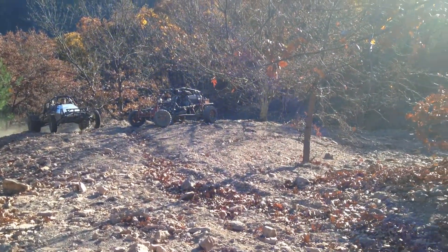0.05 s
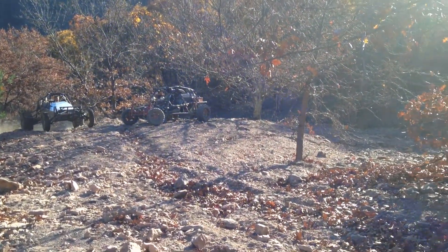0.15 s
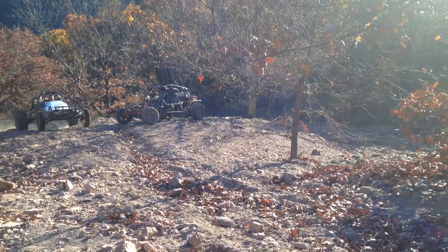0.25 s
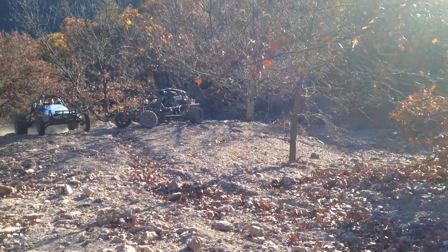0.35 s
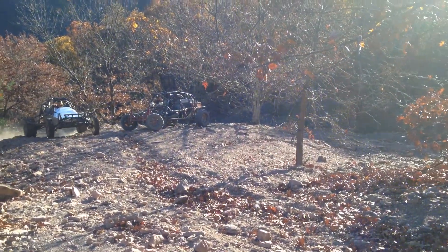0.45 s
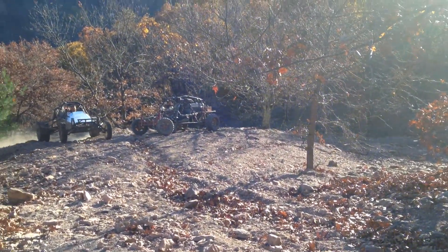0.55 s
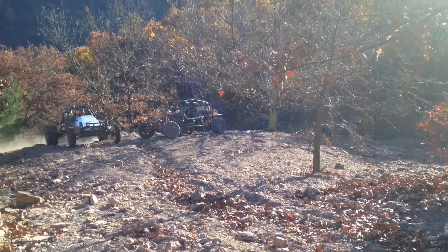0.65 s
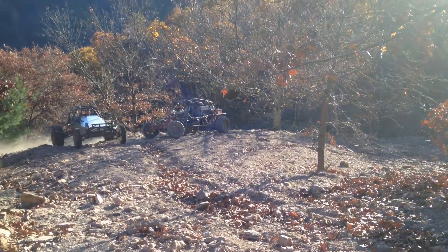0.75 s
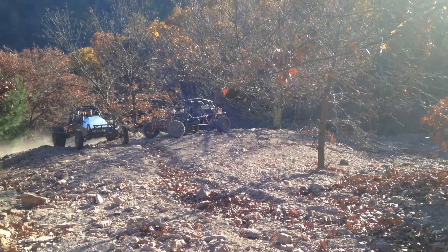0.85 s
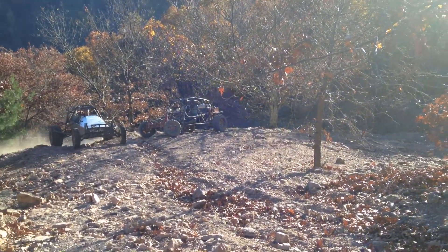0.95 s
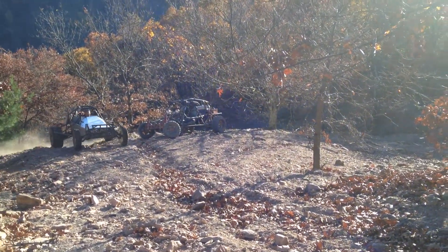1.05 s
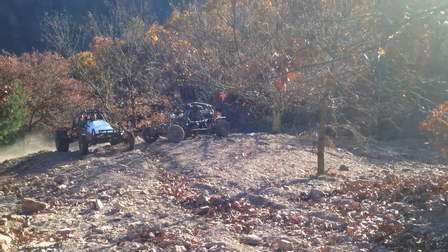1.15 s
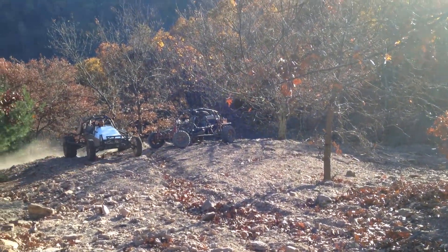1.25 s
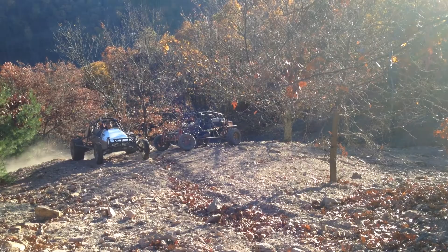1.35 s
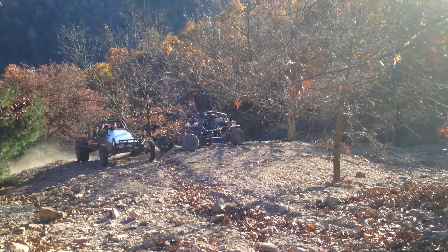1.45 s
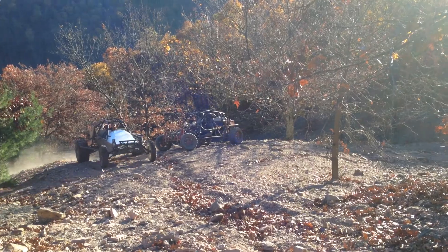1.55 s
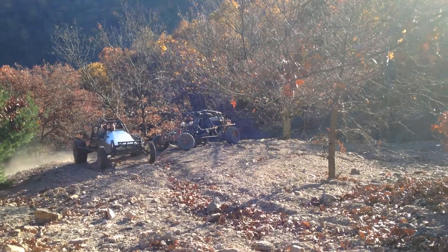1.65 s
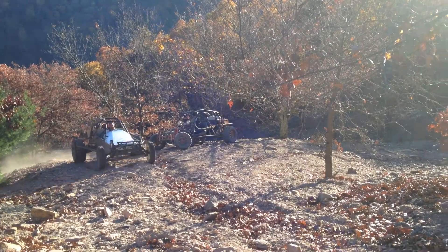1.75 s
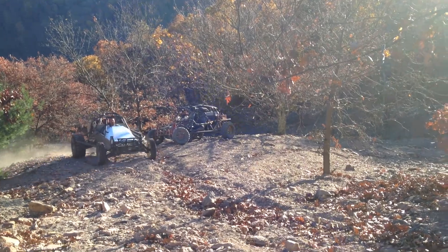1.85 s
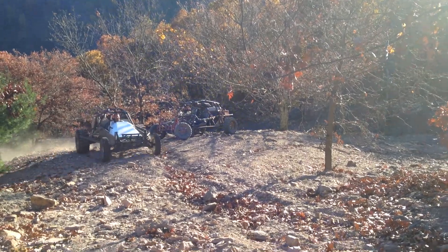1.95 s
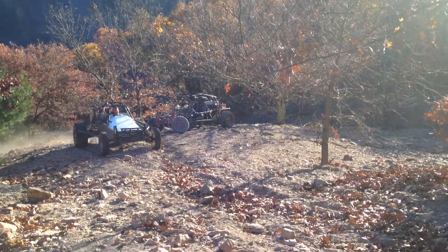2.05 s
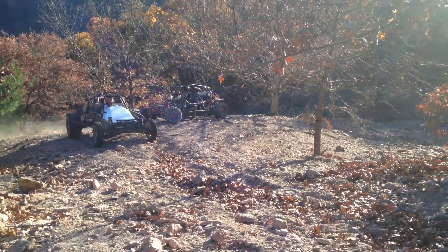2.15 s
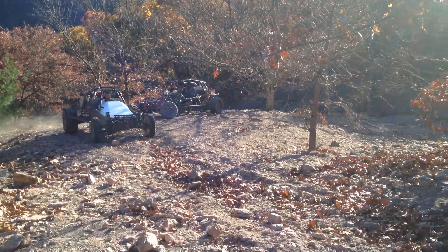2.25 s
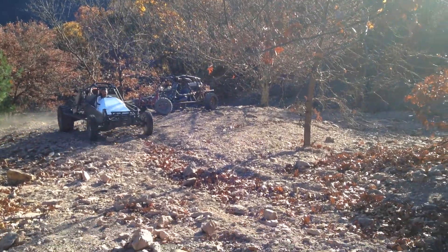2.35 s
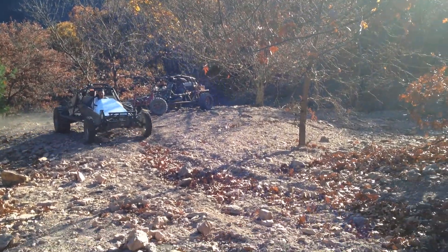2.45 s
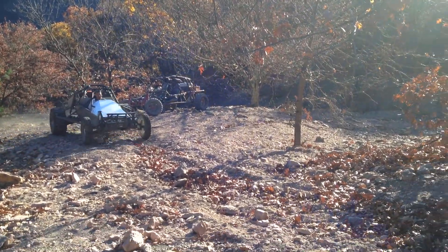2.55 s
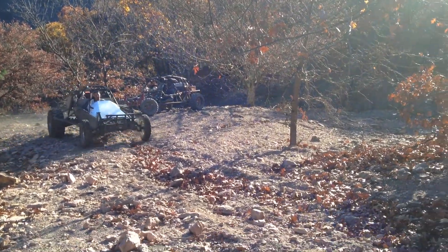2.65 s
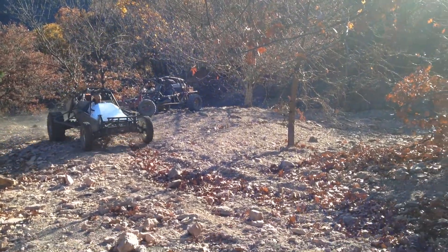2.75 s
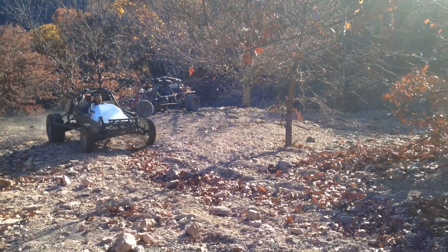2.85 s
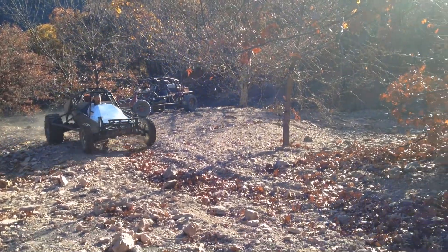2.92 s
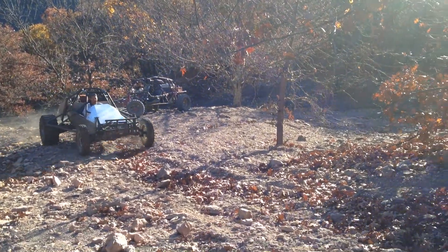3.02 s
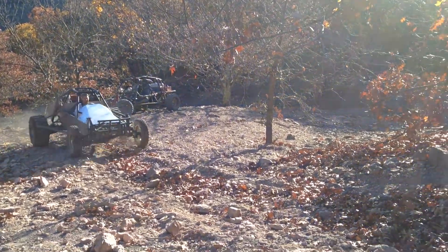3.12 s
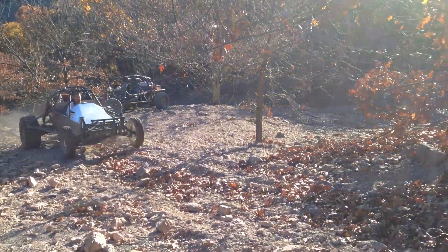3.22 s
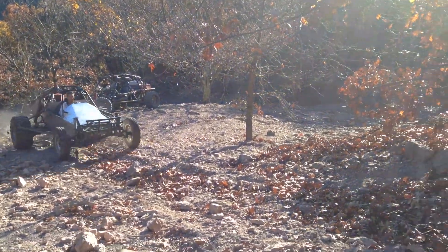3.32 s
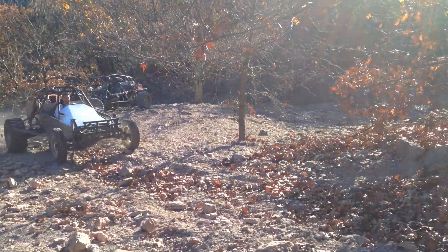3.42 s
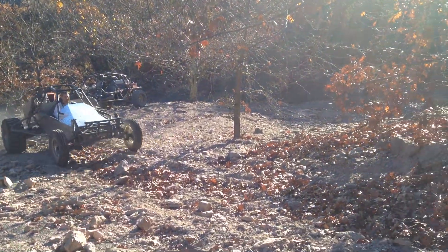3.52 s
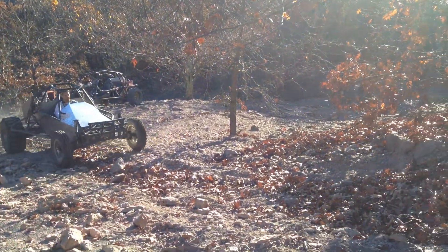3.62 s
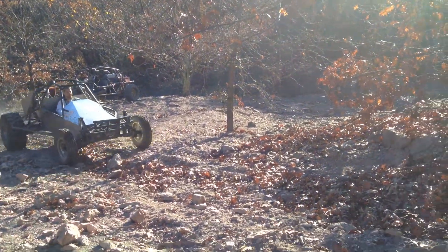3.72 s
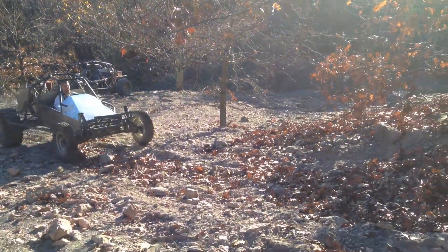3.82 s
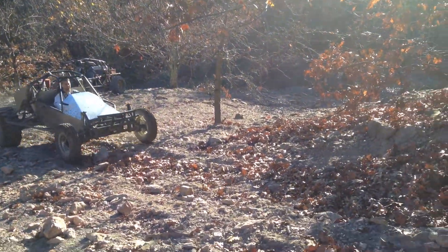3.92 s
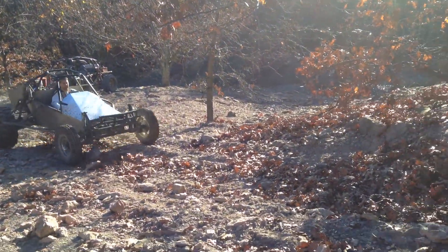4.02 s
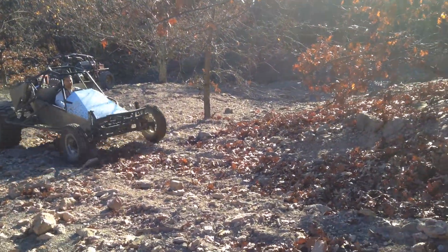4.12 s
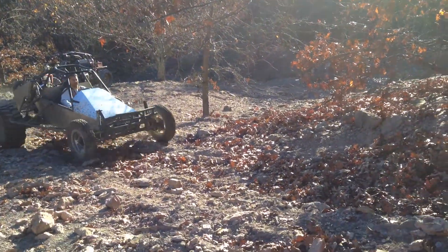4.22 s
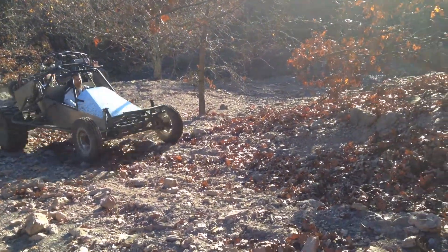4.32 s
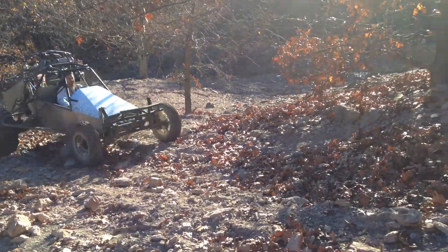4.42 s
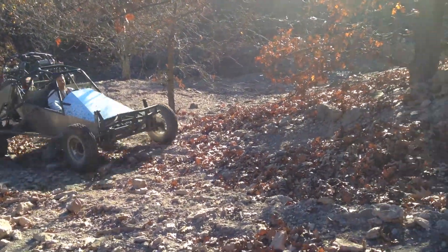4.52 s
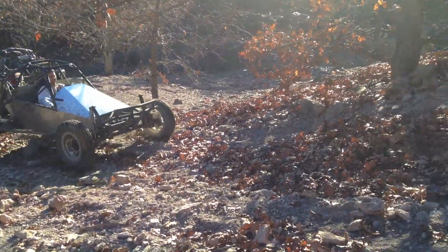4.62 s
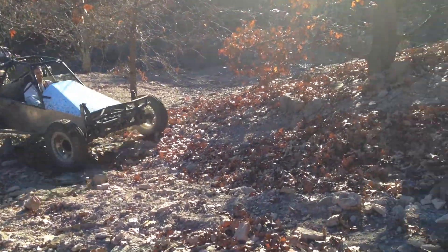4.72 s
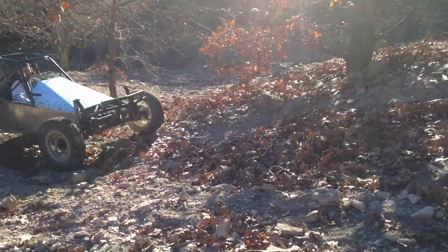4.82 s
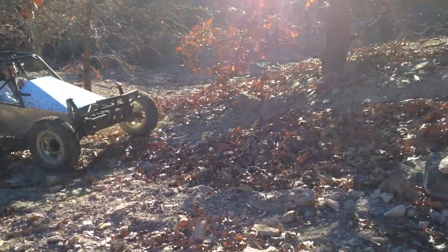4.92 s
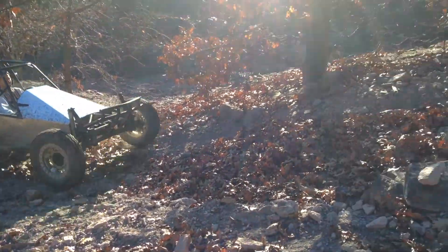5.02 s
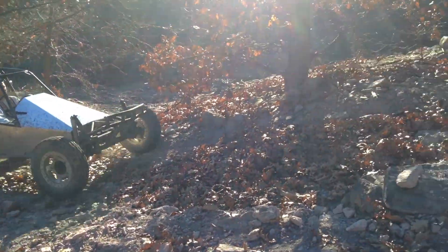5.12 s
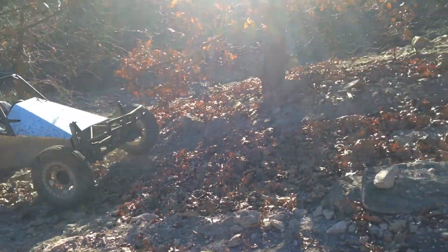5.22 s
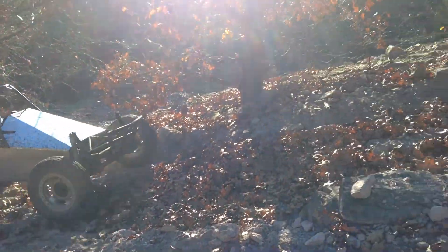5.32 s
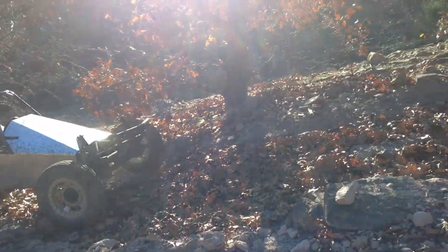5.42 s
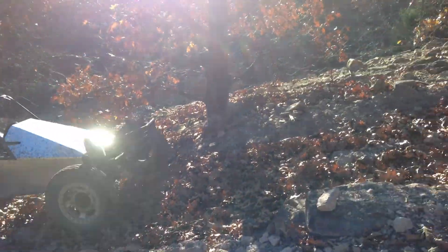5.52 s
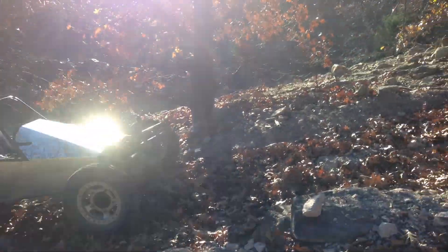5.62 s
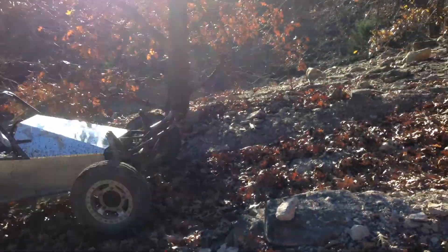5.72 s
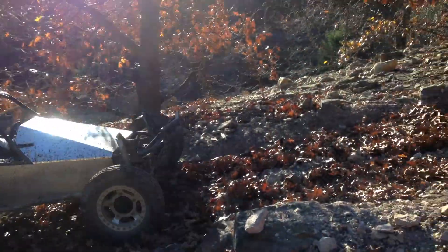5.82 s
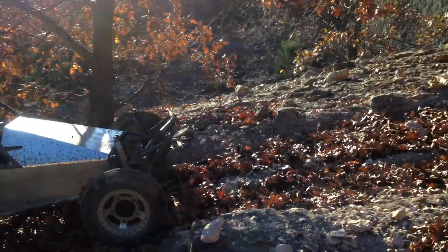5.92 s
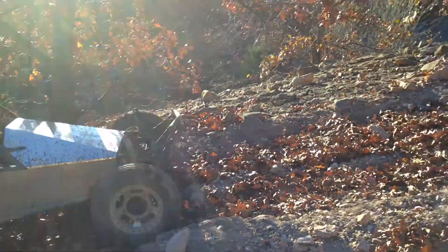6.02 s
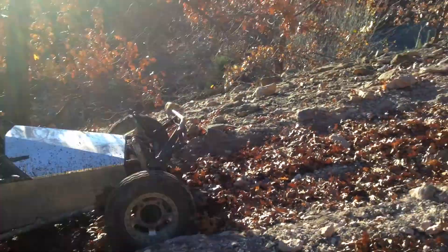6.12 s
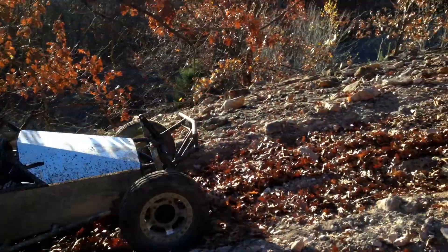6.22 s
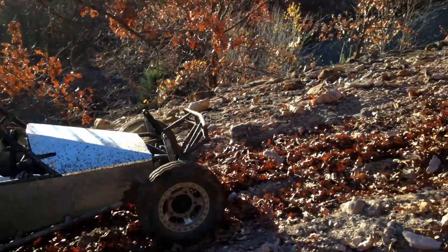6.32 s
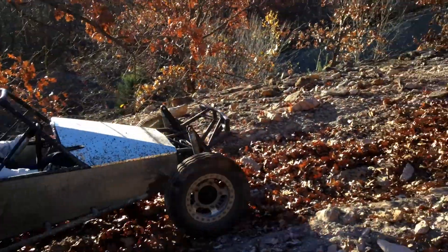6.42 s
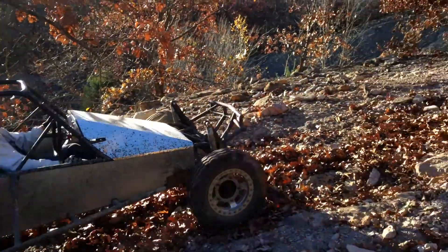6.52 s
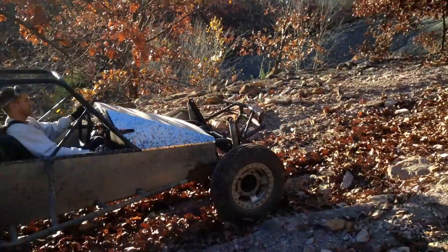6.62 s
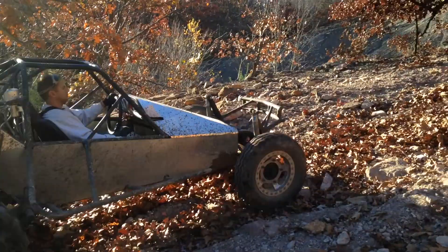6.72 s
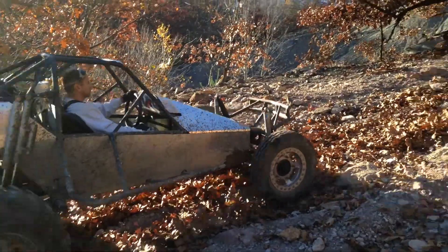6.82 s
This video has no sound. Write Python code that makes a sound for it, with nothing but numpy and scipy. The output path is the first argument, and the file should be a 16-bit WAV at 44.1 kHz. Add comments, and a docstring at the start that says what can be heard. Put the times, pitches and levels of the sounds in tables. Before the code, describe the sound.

Outdoors in quiet woods, a buggy engine approaches with low, separate exhaust thumps and hissing rasp. It sags to a stumble early, then chugs unevenly with frequent misfires. Later the throttle opens, the pitch climbs and the exhaust barks louder. At the end it is close to the microphone, with tyres crushing stones and dry leaves and a few dull frame knocks.

```python
"""Woods: a dune buggy crawls over stony ground, stumbling at low revs, then pulls hard up a loose slope close by.
Each firing is a low exhaust thump with a puff of rasping, hissing gas; some miss and give only a weak pulse.
The fronts of the pulses ring the pipe, which barks more with speed and nearness, and every firing shakes thin steel.
The tyres crush stones and dry leaves (dense noise grains), the chassis knocks, and the trees send back faint echoes."""
import sys
import numpy as np
from scipy import signal
from scipy.fft import rfft, irfft, next_fast_len
from scipy.io import wavfile

SR = 44100
rng = np.random.default_rng(int(sys.argv[2]) if len(sys.argv) > 2 else 0)


def wav_out(sig):
    """Save sig, one row per channel (or a flat mono array), as 16-bit PCM at SR to the path in sys.argv[1]."""
    wavfile.write(sys.argv[1], SR, np.round(np.clip(np.atleast_2d(sig).T, -1, 1) * 32767).astype(np.int16))


N = 302526
TIME = np.arange(N) / SR


def from_db(db):
    """Amplitude factor of a level in dB."""
    return 10 ** (np.asarray(db) / 20)


def rms_one(x):
    """Scale to unit RMS."""
    return x / np.sqrt(np.mean(x ** 2) + 1e-20)


def read(rows, at):
    """The columns of a curve at the given times."""
    s, *columns = np.transpose(rows)
    return [np.interp(at, s, column) for column in columns]


def colour(x, spectrum):
    """Causal (minimum-phase) filter with the given spectrum and unit energy."""
    size = next_fast_len(N + SR // 2)
    hz, db = np.transpose(spectrum)
    bin_hz = np.arange(size // 2 + 1) * SR / size
    gain = rms_one(from_db(np.interp(np.log(bin_hz + 1), np.log(hz), db)))
    # folding the cepstrum onto positive time gives minimum phase
    cepstrum = irfft(np.log(gain), size)
    cepstrum[1:size // 2] *= 2
    cepstrum[size // 2 + 1:] = 0
    response = np.exp(rfft(cepstrum))
    return irfft(rfft(x, size) * response, size)[:N]


def resonate(x, hz, width_hz):
    """Two-pole resonance of unit energy."""
    r = np.exp(-np.pi * width_hz / SR)
    zeros = np.sqrt((1 - r * r) / 2) * np.array([1, 0, -1])
    poles = [1, -2 * r * np.cos(2 * np.pi * hz / SR), r * r]
    return signal.lfilter(zeros, poles, x + 1e-18)   # the offset avoids denormals


def smear(x, seconds):
    """Exponential tail of unit area."""
    r = np.exp(-1 / (seconds * SR))
    return signal.lfilter([1 - r], [1, -r], x + 1e-18)


def clicks(times, sizes):
    """A train of single-sample impulses."""
    samples = np.clip(np.round(times * SR).astype(int), 0, N)
    return np.bincount(samples, sizes, N + 1)[:N]


def uneven(count, spread_db):
    """A random gain for each firing."""
    return from_db(spread_db * np.clip(rng.standard_normal(count), -2, 2))


def puffs(times, sizes, rise_s, fall_s, linger_s, linger_db):
    """Turbulence that bursts out as a valve opens, then eddies on."""
    power = smear(clicks(times, sizes ** 2), rise_s)
    power = smear(power, fall_s) + from_db(linger_db) ** 2 * smear(power, linger_s)
    return np.sqrt(power) * rng.standard_normal(N)


def engine(gas_lag_s=.0016, gas_spread_db=2.0, hiss_spread_db=2.5):
    """Every firing blows through one exhaust: pressure thump, pipe bark, turbulent gas and shaken steel."""
    # What a firing gives off. Each law: dB at half throttle, mid speed and reference distance,
    # dB from shut to open, dB per octave of speed, dB per halving of distance.
    thump_law = (-20.5, 18, 3, 1.5)
    bark_law = (-42.5, 1.5, 21, 12)
    rasp_law = (-48, 12.5, 1.5, 6.5)
    hiss_law = (-48.5, 8, -2.5, 7.5)
    # Spectra of the turbulent gas. Each row: frequency in Hz, relative level per Hz in dB.
    rasp_spectrum = [(250, -17.5), (500, 4.5), (1100, 3.5), (1500, -0.5), (1800, -2.5), (2350, -5.5),
                     (2900, -5.5), (3400, -5.5), (3900, -7.5), (5000, -14), (9000, -20)]
    hiss_spectrum = [(2500, -27.5), (4500, -5), (5500, -5), (6500, -2.5), (8000, -2), (9800, -0.5),
                     (11500, -3), (13500, -0.5), (15500, -11)]
    # How loosely the steel rattles. Each row: time in seconds, gain in dB.
    rattle = [(.6, -10), (.95, 1.5), (3, 2), (4.6, 3.5), (6, 2)]

    times, period, strength = firings()
    count = len(times)
    size = strength * np.sqrt(period * SR)   # a slow cycle holds more energy
    thumps, barks, rasps, jets = (size * from_db(follow(law, times, period))
                                  for law in (thump_law, bark_law, rasp_law, hiss_law))
    blown = times + gas_lag_s
    gas = uneven(count, gas_spread_db)
    rasp = puffs(blown, gas * rasps, rise_s=0.000093, fall_s=0.0046, linger_s=0.038, linger_db=1.0)
    jets = gas * jets * uneven(count, hiss_spread_db)
    hiss = puffs(blown, jets, rise_s=0.003, fall_s=0.004, linger_s=0.034, linger_db=-10.5)
    jolted = blown + rng.uniform(0, .001, count)
    metal = steel(jolted, size * from_db(read(rattle, times)[0]))
    pipe = thump(times, period, thumps) + bark(blown, barks)
    return pipe + metal + colour(rasp, rasp_spectrum) + colour(hiss, hiss_spectrum)


def firings(missed_db=-16, wobble_per_s=.5, spark_jitter_s=0.00013):
    """Time, period and strength of every firing; an unlit cylinder only pumps air."""
    times, period, missed = flywheel()
    # no two charges burn alike, and the slower the flywheel turns, the less evenly it runs
    jitter_s = np.hypot(spark_jitter_s, wobble_per_s * period ** 2)
    times = times + jitter_s * rng.standard_normal(len(times))
    return times, period, from_db(np.where(missed, missed_db, 0.0))


def flywheel(sag_per_miss_hz=.34, recovery_s=.0886):
    """Time and period of every stroke, and whether it misses; each miss slows the engine a little."""
    # Engine speed before sagging. Each row: time in seconds, firings per second.
    speed_hz = [(0.0, 51.22), (0.057, 54.26), (0.186, 44.44), (0.411, 48.25), (0.544, 36.19),
                (0.827, 37.03), (0.987, 43.03), (1.225, 45.56), (1.361, 54.14), (1.631, 48.04),
                (1.954, 51.03), (2.431, 51.47), (2.573, 59.44), (2.945, 51.79), (3.132, 58.73),
                (3.756, 57.58), (3.912, 51.93), (4.736, 56.24), (5.016, 68.97), (5.318, 52.09),
                (5.576, 80.38), (5.666, 78.81), (6.195, 92.17), (6.339, 85.36), (6.493, 96.36),
                (6.694, 87.99), (6.86, 98.1)]
    # Bouts of misfiring, which recur as the same cylinders come round. Each row: start in seconds,
    # firings missed in a row, times it happens, firings from one start to the next.
    misfires = [(.49, 1, 1, 0), (.567, 2, 1, 0), (.815, 1, 1, 0), (1.92, 1, 1, 0), (2.057, 2, 1, 0),
                (2.293, 2, 5, 8), (2.977, 1, 3, 8), (3.38, 2, 4, 8), (3.468, 1, 3, 8), (3.873, 2, 1, 0),
                (3.971, 1, 4, 4), (4.349, 1, 1, 0), (4.568, 1, 2, 4), (4.699, 3, 1, 0), (5.051, 1, 2, 4),
                (5.161, 2, 2, 4), (5.392, 1, 1, 0), (6.004, 1, 5, 8), (6.497, 2, 2, 7)]

    strokes, unlit, bouts = [], set(), list(misfires)
    now, sag_hz = 0, 0
    while now < N / SR:
        if bouts and now > bouts[0][0]:
            _, in_a_row, repeats, every = bouts.pop(0)
            unlit |= {len(strokes) + every * k + j for k in range(repeats) for j in range(in_a_row)}
        period = 1 / (read(speed_hz, now)[0] - sag_hz)
        missed = len(strokes) in unlit
        strokes.append((now, period, missed))
        now = now + period
        sag_hz = sag_hz * np.exp(-period / recovery_s) + sag_per_miss_hz * missed
    return np.transpose(strokes)


def follow(law, times, period, reference_m=10, mid_speed_hz=55):
    """A quality of the exhaust that follows throttle, engine speed and nearness."""
    # How far the throttle is open. Each row: time in seconds, share from 0 to 1.
    throttle_curve = [(0, .36), (.2, 0.24), (.47, 0.22), (.58, 0), (.8, 0.09), (1.0, 0.35), (1.22, 0.35),
                      (1.37, 0.53), (1.7, .32), (2.3, 0.41), (3.15, 0.49), (3.9, 0.48), (4.5, 0.56),
                      (4.7, 0.49), (4.85, 0.75), (5.28, 0.55), (5.56, .94), (6.1, 0.8), (6.86, 0.63)]
    # From the engine to the listener. Each row: time in seconds, distance in m.
    distance_curve = [(0, 14), (3, 9.6), (4.5, 7.3), (5.6, 7), (6.86, 4.25)]

    base, per_throttle, per_octave, per_halving = law
    throttle = read(throttle_curve, times)[0]
    distance_m = read(distance_curve, times)[0]
    octaves = -np.log2(period * mid_speed_hz)
    halvings = np.log2(reference_m / distance_m)
    return base + per_throttle * (throttle - .5) + per_octave * octaves + per_halving * halvings


def thump(times, period, sizes, note_hz=203, note_width_hz=75, note_db=3,
          boom_share=0.58, boom_speed_hz=81.4, boom_width_hz=9.8):
    """The low pulse is harder under throttle and close by; near one speed the pipe's main note booms."""
    # Share of the hard pulse: at half throttle, mid speed and reference distance,
    # from shut to open, per octave of speed, per halving of distance.
    hardness_law = (0.29, 0.73, -0.033, 0.49)
    # Exhaust response to a soft puff, and to a hard, short one. Each row: frequency in Hz, relative level in dB.
    soft_spectrum = [(30, -35), (50, -8.5), (98, 0), (148, 2.5), (195, 1), (245, -14), (295, -25),
                     (360, -20.5), (415, -40), (900, -65), (2000, -94)]
    hard_spectrum = [(30, -40), (55, -2), (82, 0.5), (122, 1), (160, 1.5), (183, 5.5), (238, 1.5),
                     (272, -6.5), (320, -6), (368, -19), (405, -40.5), (480, -27.5), (900, -56),
                     (2000, -76.5)]

    hard = np.clip(follow(hardness_law, times, period), 0, 1)
    sizes = sizes * uneven(len(times), spread_db=1.1)
    soft_pulses = colour(clicks(times, sizes * (1 - hard)), soft_spectrum)
    hard_pulses = colour(clicks(times, sizes * hard), hard_spectrum)
    pulses = soft_pulses + hard_pulses
    peak = signal.iirpeak(note_hz, note_hz / note_width_hz, fs=SR)
    note = from_db(note_db) * signal.lfilter(*peak, pulses)
    speed_hz = np.interp(TIME, times, 1 / period)
    boom = boom_share * np.exp(-((speed_hz - boom_speed_hz) / boom_width_hz) ** 2)
    return (1 - boom) * pulses + boom * note


def bark(times, sizes, level_db=-10):
    """The steep front of each pulse and the gas behind it ring the pipe."""
    # Upper resonances of the pipe. Each row: frequency in Hz, width in Hz, relative level in dB.
    pipe_modes = [(366, 96, -8.5), (490, 90, -2.5), (526.4, 83, -2.5), (664, 154, -5), (737, 90, -5)]

    sizes = sizes * uneven(len(times), spread_db=2.4)
    gas = puffs(times, sizes, rise_s=.0004, fall_s=.0025, linger_s=.015, linger_db=-2)
    drive = from_db(level_db) * (clicks(times, sizes) + .75 * gas)
    # neighbouring modes have opposite signs
    return sum((-1) ** k * from_db(db) * resonate(drive, hz, width_hz)
               for k, (hz, width_hz, db) in enumerate(pipe_modes))


def steel(times, sizes):
    """Each firing jolts the thin steel of the exhaust, never twice alike."""
    # Each row: frequency in Hz, width in Hz, relative level in dB, spread from firing to firing in dB.
    steel_modes = [(1830, 130, -60.5, 4), (2860, 90, -61, 4.5), (8050, 620, -56, 4.5)]

    return sum(resonate(clicks(times, sizes * from_db(db) * uneven(len(times), spread_db)), hz, width_hz)
               for hz, width_hz, db, spread_db in steel_modes)


def tyres(grains_per_s=2000):
    """Dense small fractures of stones and leaves, swelling where a tyre breaks through."""
    # Tyres on loose ground. Each row: time in seconds, level in dB.
    rolling = [(0, -61), (3, -67), (4.5, -47), (5.3, -45.5), (5.8, -42.5), (6.4, -32.5), (6.86, -25.5)]
    # Stones and leaves crushed under a tyre. Each row: start in seconds, level in dB, length in seconds.
    crunches = [(6.222, -26.5, 0.021), (6.52, -23.5, 0.033), (6.62, -23.5, 0.031), (6.726, -38, 0.018),
                (6.82, -26.5, .04)]
    # Spectrum of the fractures. Each row: frequency in Hz, relative level per Hz in dB.
    gravel = [(200, 3), (600, 6.5), (1500, 0), (2300, -2), (3100, 4), (4200, -4.5), (5400, 3), (6600, -3),
              (8500, 2.5), (15500, -4.5)]

    power = from_db(read(rolling, TIME)[0]) ** 2
    for start_s, db, length_s in crunches:
        age = np.maximum(TIME - start_s, 0) / length_s
        power = power + from_db(db) ** 2 * (1 - np.exp(-8 * age)) * np.exp(-age ** 2)
    born = rng.random(N) < grains_per_s / SR
    sizes = from_db(3 * np.minimum(rng.exponential(1, N), 5))
    grains = np.sqrt(smear(born * sizes ** 2, seconds=0.0021)) * rng.standard_normal(N)
    return np.sqrt(power) * rms_one(colour(grains, gravel))


def chassis(width_hz=170, fade_s=0.0077):
    """Short, dull rattles of the frame over stones: fading noise bursts through a resonance."""
    # Each row: start in seconds, frequency in Hz, level of the burst in dB.
    knocks = [(5.467, 700, -21), (6.146, 694, -20), (6.36, 810, -20), (6.735, 690, -20)]

    rattles = 0
    for start_s, hz, db in knocks:
        fade = (TIME > start_s) * np.exp(-np.abs(TIME - start_s) / fade_s)
        burst = from_db(db) * fade * rng.standard_normal(N)
        rattles = rattles + resonate(burst, hz, width_hz)
    return rattles


def trees(x, echo_db=-21, fade_s=0.12, dull_hz=2500, count=60):
    """Trunks and the hillside scatter many faint, dull echoes."""
    delays_s = rng.uniform(0.013, .3, count)
    sizes = rng.standard_normal(count) * np.exp(-delays_s / fade_s)
    echoes = signal.fftconvolve(x, clicks(delays_s, sizes / np.linalg.norm(sizes)))[:N]
    dulling = signal.butter(1, dull_hz, fs=SR, output="sos")
    return from_db(echo_db) * signal.sosfilt(dulling, echoes)


def woods(level_db=-35):
    """The quiet of the woods: steady, mostly low noise."""
    # Each row: frequency in Hz, relative level per Hz in dB.
    woods_spectrum = [(25, -5), (60, 1), (180, 11), (400, -14.5), (1000, -25), (3000, -24), (8000, -30),
                      (15000, -37.5)]

    return from_db(level_db) * colour(rng.standard_normal(N), woods_spectrum)


def scene():
    """The buggy, its echoes and the quiet of the woods."""
    buggy = engine() + tyres() + chassis()
    return (buggy + trees(buggy) + woods())[None]


def record(dry, cutoff_hz=15500):
    """The top is cut steeply."""
    lowpass = signal.ellip(12, .1, 90, cutoff_hz, fs=SR, output="sos")
    return signal.sosfilt(lowpass, dry)


dry = scene()
out = record(dry)
wav_out(out)
```